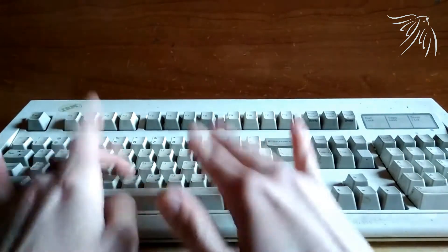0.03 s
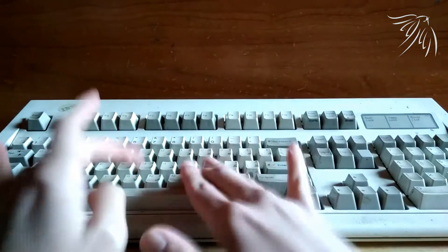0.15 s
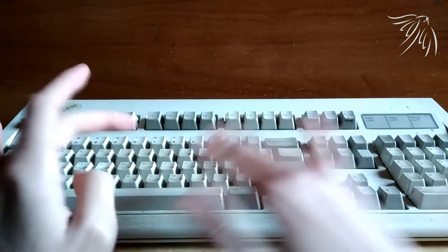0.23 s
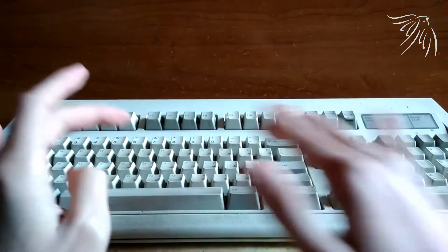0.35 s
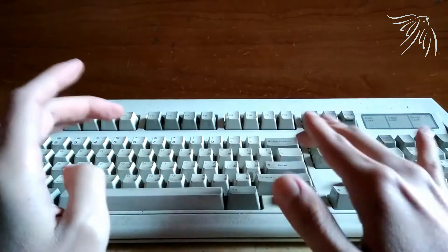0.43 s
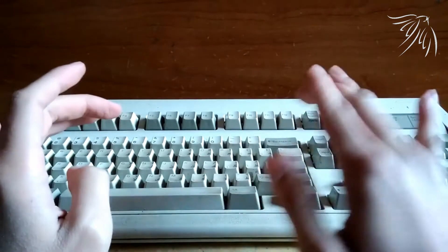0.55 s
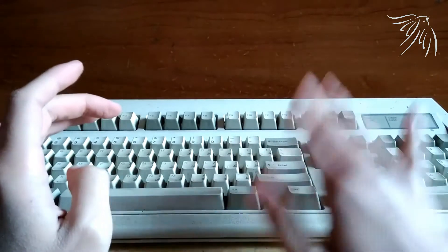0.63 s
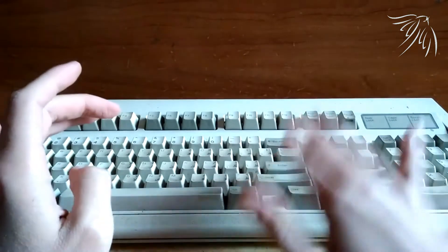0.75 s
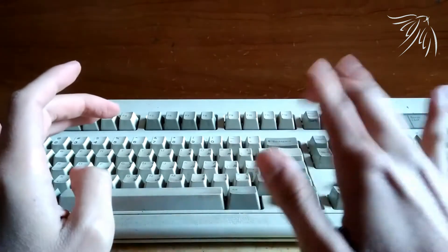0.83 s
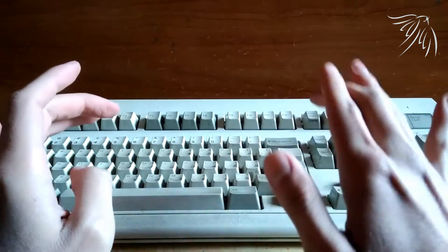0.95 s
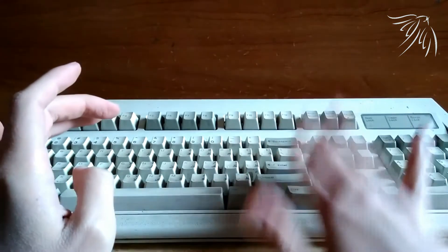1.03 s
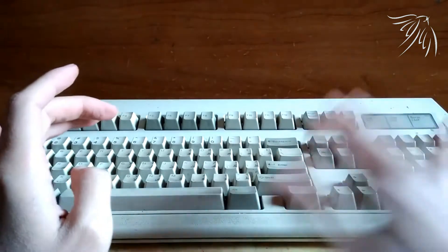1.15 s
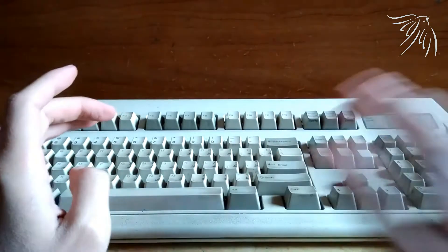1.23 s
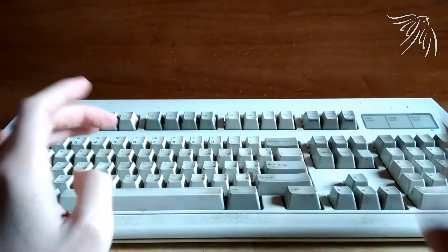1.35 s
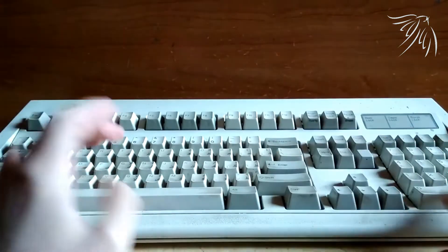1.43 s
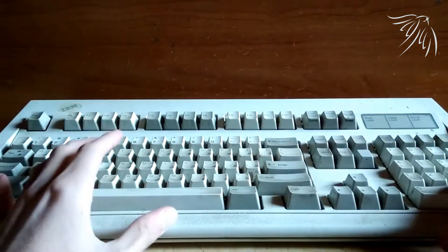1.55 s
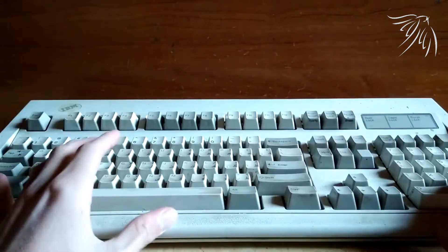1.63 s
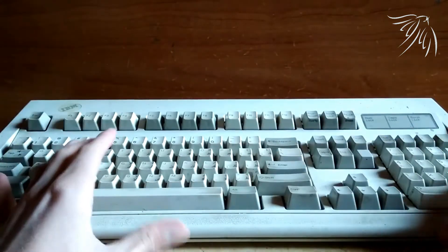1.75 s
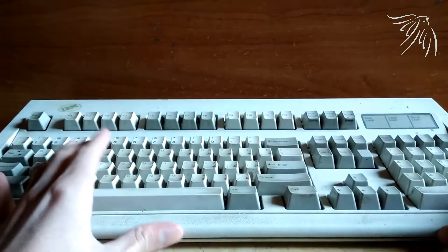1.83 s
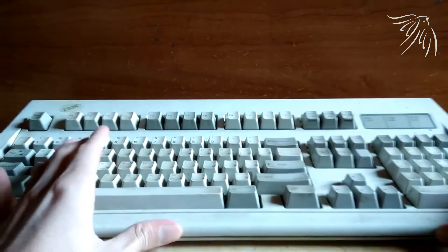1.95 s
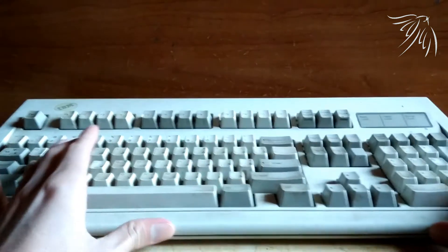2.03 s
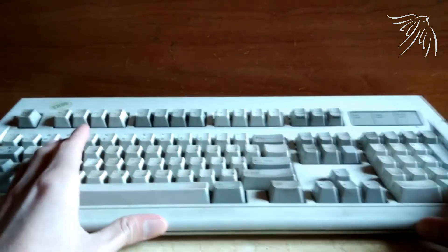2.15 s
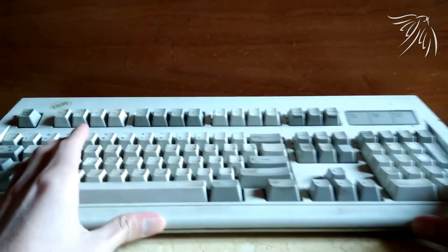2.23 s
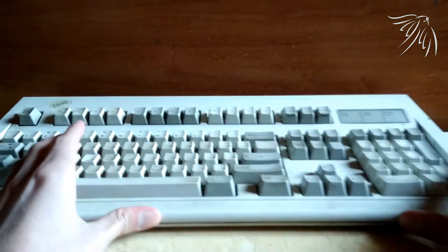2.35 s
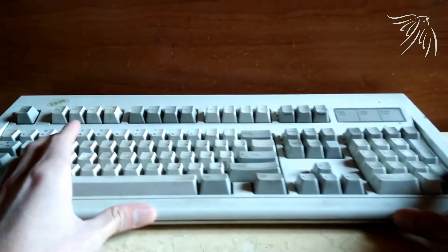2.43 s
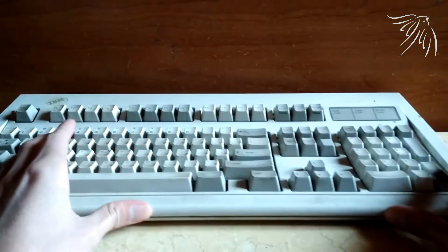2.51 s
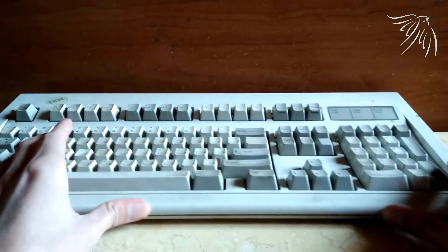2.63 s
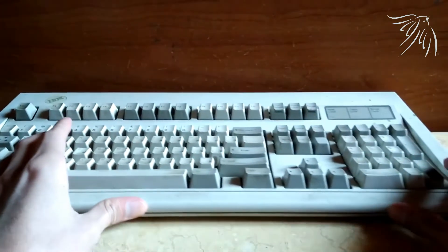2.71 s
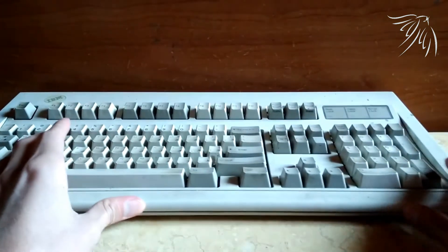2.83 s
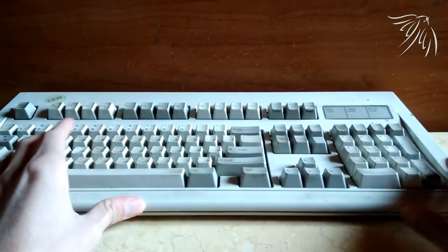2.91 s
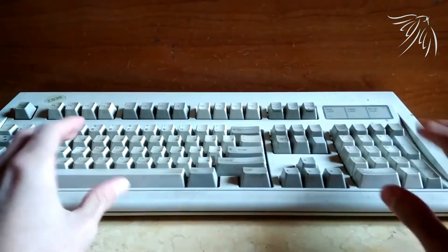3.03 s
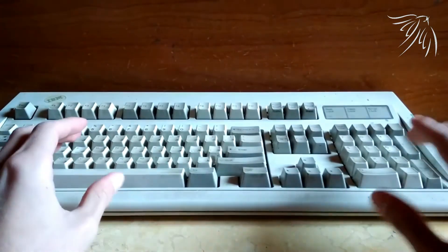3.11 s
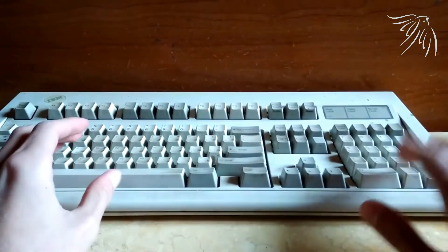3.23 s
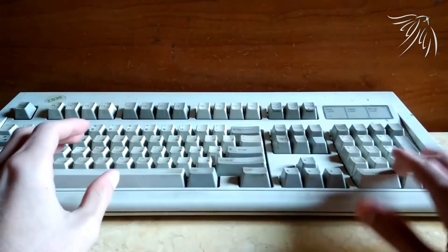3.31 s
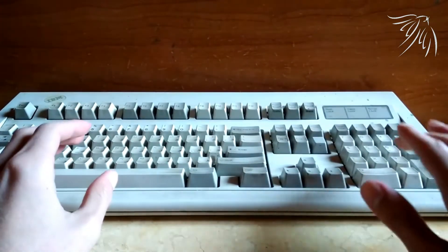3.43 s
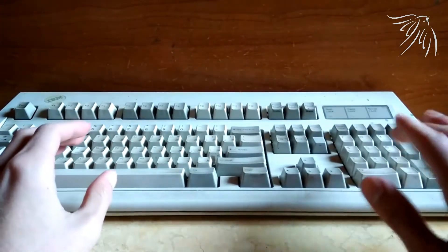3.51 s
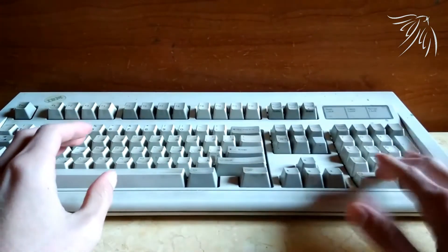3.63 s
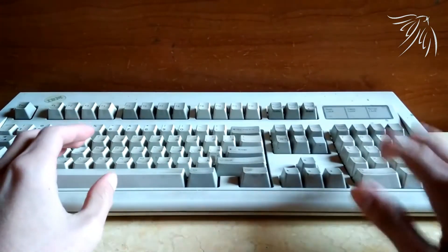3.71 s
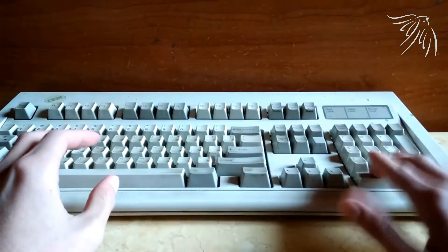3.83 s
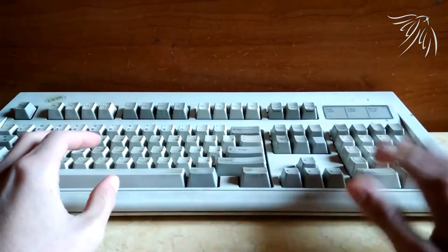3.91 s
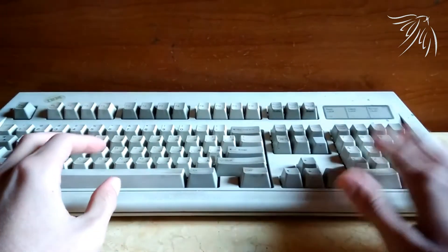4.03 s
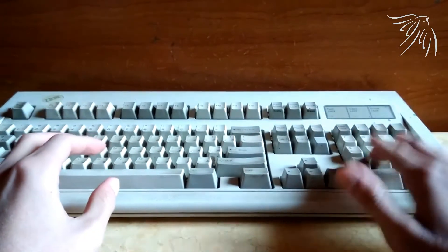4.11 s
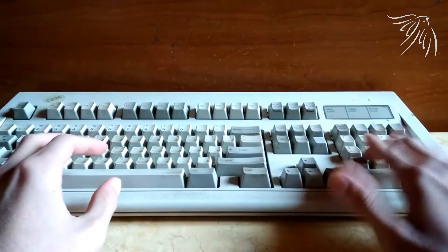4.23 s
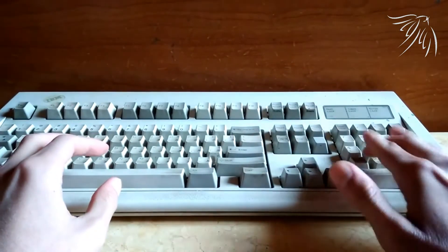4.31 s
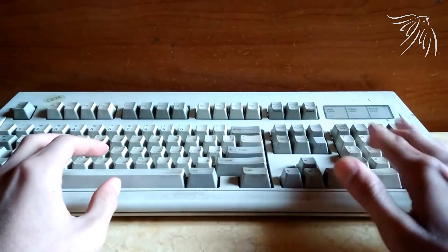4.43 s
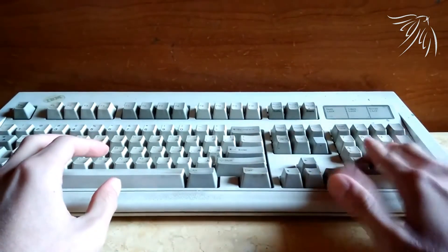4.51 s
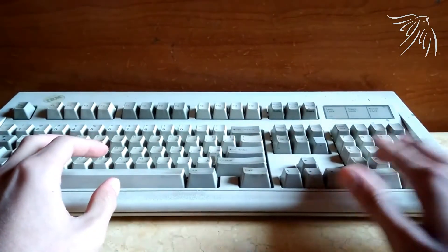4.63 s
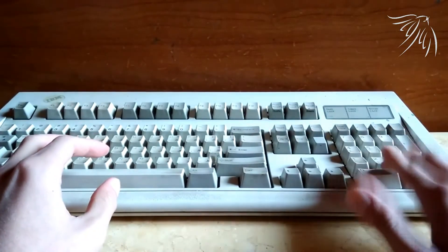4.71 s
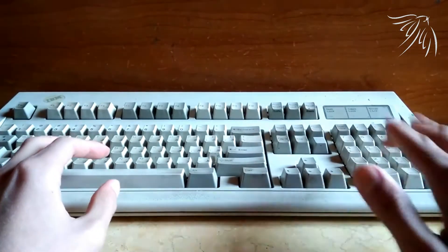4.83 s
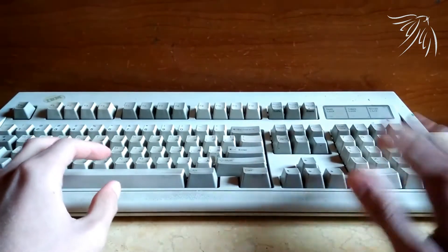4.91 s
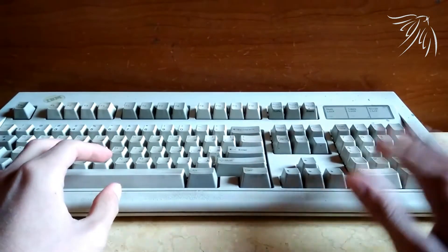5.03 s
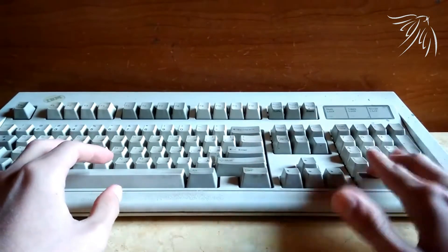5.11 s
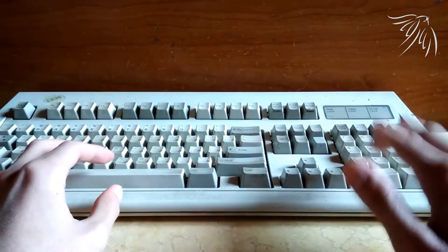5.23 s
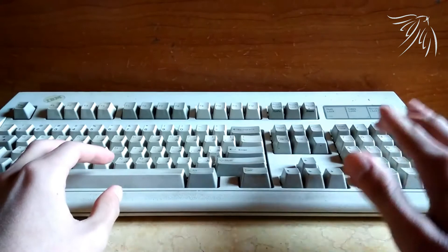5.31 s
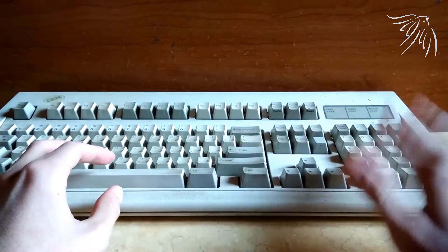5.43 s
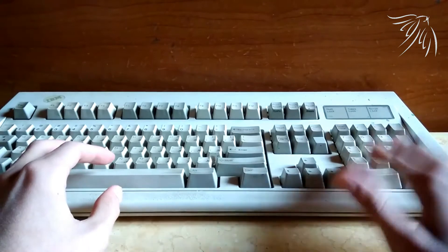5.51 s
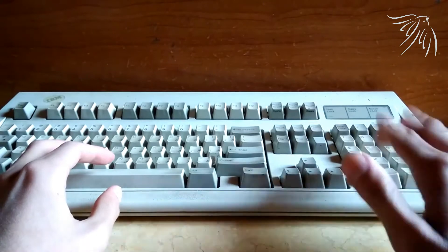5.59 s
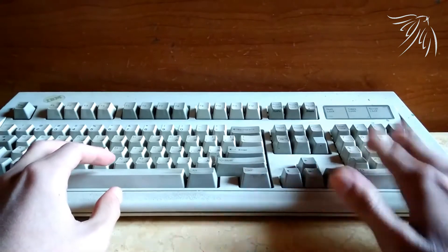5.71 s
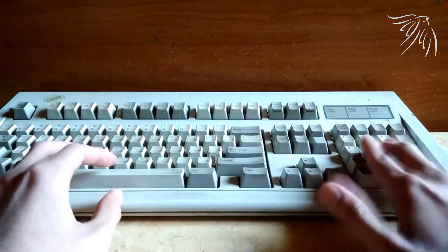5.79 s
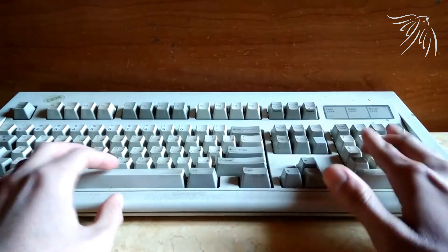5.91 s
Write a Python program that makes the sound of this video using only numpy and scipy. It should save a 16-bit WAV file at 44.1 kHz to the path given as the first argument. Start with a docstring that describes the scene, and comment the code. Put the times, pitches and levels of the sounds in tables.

```python
"""Buckling-spring keyboard on a wooden desk

Single keys are struck and let go, close to a stereo recorder in a small room. Each stroke is a finger
tap, the snap of a buckling spring and a release; these impacts excite damped modes of cap, case and desk.
Midway both hands push the keyboard across the desk, and its feet groan and rasp by stick-slip friction.
The loudest snaps overload the microphones."""
import sys
import numpy as np
from scipy import signal
from scipy.fft import rfft, irfft
from scipy.io import wavfile

SR = 44100
rng = np.random.default_rng(int(sys.argv[2]) if len(sys.argv) > 2 else 0)


def unload_audio(sound):
    """Save the sound as a 16-bit wav file, at the path given as the first command line argument."""
    columns = np.transpose(np.atleast_2d(sound))
    # keep every value between -1 and 1, then stretch to whole-number steps
    steps = np.round(np.clip(columns, -1, 1) * 32767)
    wavfile.write(sys.argv[1], SR, steps.astype(np.int16))


N = 262836
LEAD, ONSET = SR // 10, SR // 100  # samples before time zero; samples of rising noise before an impact
AGE = np.arange(SR // 8) / SR  # time since an impact, s
PUSH_START_S, PUSH_STOP_S = 2.064, 3.018


# presses: t/s, knock level/dB, click level/dB, cap f/Hz, click left minus right/dB,
# finger lead/s, finger knock level/dB
KEY_PRESSES = [(-.018, -9.5, -19.5, 1820, -3, 0.0062, -25), (.1716, -6.5, -21.5, 1860, -5.5, .003, -36),
               (0.294, -8.5, -20, 1904, -13, .002, -28), (.846, -4.5, -9, 1410, -4.5, .0046, -12.5),
               (1.2385, -19.5, -20, 1251, -2.5, 0.0049, -15.5),
               (3.7977, -7.5, -14, 2021, 3.5, 0.0067, -24.5),
               (3.9794, -6.5, -14.5, 2090, -0.5, 0.0049, -28),
               (4.2487, -13.5, -18.5, 2510, 8.5, 0.012, -29), (4.3825, -25, -35, 1070, 2, .003, -38),
               (4.663, -12, -13, 2390, 3, .0087, -21.5), (5.104, -5.5, -11.5, 1966, 5.5, 0.0067, -27.5),
               (5.2999, -5.5, -14.5, 2090, 0, 0.0035, -28.5),
               (5.6362, -6.5, -16.5, 2036, -2.5, 0.0055, -20),
               (5.8242, -11.5, -14.5, 2260, 4.5, 0.0076, -22)]
# keys flying back to the top stop: t/s, knock level/dB, click level/dB
KEY_RELEASES = [(0.374, -10, -18.5), (0.9038, -11.5, -19.5), (1.2944, -12, -19), (3.8614, -14.5, -26.5),
                (4.046, -14.5, -25), (4.315, -24, -37), (4.465, -33, -48), (4.7744, -31, -38),
                (5.1673, -12.5, -23), (5.3588, -12.5, -22), (5.6942, -10, -22), (5.8847, -17.5, -31.5)]
# loose caps touched or rattling: t/s, knock level/dB, click level/dB, cap f/Hz
CAP_TAPS = [(0.1178, -19.5, -25.5, 1740), (0.1249, -24, -24, 1790), (.182, -14, -28.5, 1680),
            (0.2127, -15.5, -23, 1620), (0.2189, -22, -23, 1440), (0.2988, -10, -27, 1890),
            (0.3077, -19, -15, 1467), (1.939, -41.5, -42, 1700), (2.083, -59, -48, 1390),
            (3.411, -39, -44.5, 2160), (3.4818, -25, -36.5, 2085), (4.4051, -27.5, -47, 1110),
            (4.4474, -41, -53.5, 1550), (4.5204, -31, -48.5, 1680), (4.5475, -37, -62.5, 1127),
            (5.141, -27, -41, 2100), (5.671, -22, -38, 1960)]
# dull low knocks of the case, alone or beneath a key stroke: t/s, knock level/dB, f/Hz
CASE_KNOCKS = [(1.24, -23, 560), (1.773, -42.5, 611), (1.942, -39.5, 708), (2.076, -45, 795),
               (3.128, -49, 697), (3.146, -51, 538), (3.419, -38.5, 1000), (3.487, -40.5, 515),
               (4.777, -35, 753), (4.873, -35, 674), (4.945, -50, 930)]

def keys(paths=5, dull_click_db=-19):
    """Impact excitation: every contact gives a knock and a click; dull ones barely stir the springs."""
    strokes = []
    for s, knock_db, click_db, hz, pan_db, early_s, finger_db in KEY_PRESSES:
        strokes.append((s - early_s, finger_db, click_db - 12, 1431, .031))  # the finger lands
        strokes.append((s, knock_db, click_db, hz, .014, pan_db))  # the spring buckles, the key bottoms
    for s, knock_db, click_db in KEY_RELEASES:
        strokes.append((s, knock_db, click_db, 1806, .014))  # the cap hits its top stop
        settle_db = knock_db - 17
        strokes.append((s + .009, settle_db, settle_db + dull_click_db, 850, .025))  # and drops back
    strokes += [(*tap, .033) for tap in CAP_TAPS]
    strokes += [(s, db, db + dull_click_db, hz, .072) for s, db, hz in CASE_KNOCKS]
    # successive strokes take turns among several room responses
    tracks = np.zeros((paths, 2, LEAD + N))
    for k, (s, *stroke) in enumerate(strokes):
        add(tracks[k % paths], s - ONSET / SR, rattle(key_impact(*stroke)))
    return sum(track + room(track) for track in tracks)


def key_impact(knock_db, click_db, cap_hz, ring_s, pan_db=0, case_db=-8, board_db=-6):
    """Superposition: cap, case and board sum to a knock, and the spring adds its click."""
    knock = equal_energy(cap_modes(cap_hz, t60=.58 * ring_s))
    knock += undb(case_db) * equal_energy(case_modes(cap_hz))
    knock += undb(board_db) * equal_energy(board_modes(cap_hz))
    click = equal_energy(spring_click(t60=1.5 * ring_s))
    return undb(knock_db) * knock + undb(click_db + pan_db * np.array([[.5], [-.5]])) * click


# modes of a keycap on the plate: ratio to the cap frequency, level/dB
CAP_MODES = [(.42, -16), (.62, -6.5), (.84, 0.5), (1.001, 4), (1.13, 0)]

def cap_modes(cap_hz, t60, contact_s=.0027, phase_spread_rad=.54):
    """Damped free vibration: the cap's inharmonic modes reach each microphone in a different phase."""
    cap = 0
    for ratio, db in CAP_MODES:
        phase = 2 * np.pi * cap_hz * ratio * (1 + .051 * rng.standard_normal()) * AGE
        cap = cap + undb(db) * np.sin(phase + phase_spread_rad * rng.standard_normal((2, 1)))
    return cap * fade(AGE, t60) * (1 - np.exp(-AGE / contact_s))


# modes of the plastic case and steel plate: f/Hz, level/dB, T60/s
CASE_MODES = [(407, -29, 0.09), (507.7, -13, 0.29), (560, -11.5, 0.063), (680, -9, 0.053),
              (768, -2.5, 0.04), (930, -9, 0.11), (1110, -10.5, 0.053), (1680, -1, 0.051), (1890, 0, 0.052),
              (2248, 12, 0.025), (2715, -6.5, 0.092), (3600, -19, .06), (3700, -10.5, 0.08)]

def case_modes(cap_hz, spot_db=3):
    """Modal excitation: each striking point favours other modes, and a soft blow misses the high ones."""
    hz, db, t60 = np.transpose(CASE_MODES)[:, :, None]
    db = db - bass_loss_db(hz, cap_hz) + spot_db * rng.standard_normal(hz.shape)
    weight = undb(db) * rng.choice([-1, 1], hz.shape) / (1 + (hz / (1.5 * cap_hz)) ** 4)
    detuned_hz = hz * (1 + .055 * rng.standard_normal(hz.shape))
    return np.sum(weight * np.sin(2 * np.pi * detuned_hz * AGE) * fade(AGE, t60), axis=0)


# dense resonances of the whole board: f/Hz, level/dB
BOARD_SPECTRUM = [(100, -23.5), (300, -14), (500, 2), (1000, 5), (2000, -3.5), (2700, 3.5), (4000, -4),
                  (7000, -32.5), (14000, -45.5)]

def board_modes(cap_hz, t60=.04):
    """Modal overlap: resonances too dense to resolve decay as a burst of noise."""
    spectrum = [(hz, db - 10 * np.log10(1 + (hz / (2.3 * cap_hz)) ** 4) - bass_loss_db(hz, cap_hz))
                for hz, db in BOARD_SPECTRUM]
    return colour(stereo_noise(len(AGE), alike=.6) * fade(AGE, t60), spectrum)


def bass_loss_db(hz, cap_hz, db_per_octave=3.5):
    """Weak coupling: a bright blow drives modes less the further they lie below half its frequency."""
    return db_per_octave * np.maximum(np.log2(cap_hz / hz) - 1, 0)


# click of a spring against its barrel: f/Hz, level/dB
CLICK_SPECTRUM = [(500, -30.5), (2000, -18), (3200, 2.5), (4000, 3), (5000, 2), (6500, 0.5), (9000, -9.5),
                  (13000, -12), (16000, -22.5)]

def spring_click(t60, chatter_db=4, rise_s=.0006):
    """Contact chatter: the coil hits its barrel in a quick, uneven series."""
    chatter = undb(chatter_db * np.interp(AGE, np.linspace(0, AGE[-1], 200), rng.standard_normal(200)))
    envelope = chatter * fade(AGE, t60) * (1 - np.exp(-AGE / rise_s))
    return colour(stereo_noise(len(AGE), alike=.26) * envelope, CLICK_SPECTRUM)


def rattle(impact, onset_db=-20, bounce_db=-22, bounce_s=.042, bounces=6):
    """Rebound: light bounces follow each impact; a faint, rising noise before it softens the attack."""
    excitation = np.zeros(len(AGE))
    rising_noise = rng.standard_normal(ONSET) * fade(AGE[:ONSET], t60=.011)[::-1]
    excitation[:ONSET] = undb(onset_db) * unit(rising_noise) / np.sqrt(ONSET)
    excitation[ONSET] = 1
    for late in rng.uniform(.1, 1, bounces):
        excitation[ONSET + int(late * bounce_s * SR)] += undb(bounce_db) * np.exp(-late)
    return signal.fftconvolve(impact, excitation[None], axes=-1)


# modes of a freed spring: f/Hz, level/dB, T60/s
SPRING_MODES = [(701, 0, 1.1), (710, -7, .9), (706, 3, .25), (722, -6, .4)]
# springs singing on after a release: t/s, level/dB
SPRING_PINGS = [(.3745, -39), (.9045, -49.5), (1.2947, -58), (4.0468, -47), (5.1675, -58), (5.3592, -48)]

def spring_pings():
    """Beating: closely spaced modes make the faint note of a freed spring waver."""
    track, note = np.zeros((2, LEAD + N)), ringing(SPRING_MODES, build_cycles=3.5)
    for s, db in SPRING_PINGS:
        add(track, s, undb(db) * note)
    return track


# modes of the wooden desk: f/Hz, level/dB, T60/s
DESK_MODES = [(42, -4.5, 0.29), (57.88, 6, 0.7), (62.63, -9.5, 2), (86.5, -7.5, 0.37), (143, -15, 0.19),
              (179, 4, 0.18), (220.3, -4.5, 0.44)]
# dull shudder of the desk top: f/Hz, level/dB
SHUDDER_SPECTRUM = [(22, -42), (33, -30), (44, -6.5), (58, 10.5), (75, -6.5), (110, -16.5), (190, -4.5),
                    (300, -28.5), (700, -50)]

def desk(shudder_db=-1, recoil_db=-35, moved_db=-.5):
    """Structure-borne sound: a harder press shakes the desk more; a release kicks it lightly."""
    track, t = np.zeros((2, LEAD + N)), np.arange(SR) / SR
    thump = ringing(DESK_MODES, build_cycles=4.7)
    envelope = fade(t, t60=.57) * (1 - np.exp(-t / .017))
    for s, knock_db, *_ in KEY_PRESSES:
        thump_db = -37 + .56 * knock_db + moved_db * (s > PUSH_STOP_S)
        shudder = unit(colour(stereo_noise(SR, alike=.92), SHUDDER_SPECTRUM)) * envelope
        add(track, s, undb(thump_db) * (thump + undb(shudder_db) * shudder))
    for s, knock_db, _ in KEY_RELEASES:
        add(track, s, undb(knock_db + recoil_db) * thump)
    return track


# shoves that make the feet bite: centre t/s, duration/s, gain/dB
SHOVES = [(2.386, 0.035, 3), (2.505, 0.095, 3.5), (2.615, 0.16, 6), (2.848, 0.086, 4.5)]
# groaning case, rasping feet and hissing wood grain, each: f/Hz, level/dB
GROAN_SPECTRUM = [(150, -25), (300, -22.5), (400, -3.5), (520, 1), (680, 0.5), (880, 6.5), (1100, -3),
                  (1500, -23), (3000, -40)]
RASP_SPECTRUM = [(600, -22), (1100, -0.5), (1400, -1), (1720, 1.5), (2000, -4.5), (2450, -0.5), (3000, -5),
                 (4000, -24), (9000, -29.5)]
HISS_SPECTRUM = [(1800, -18), (3200, -3), (4200, -2.5), (5500, 0), (7000, -6), (9000, -13), (13000, -18.5),
                 (16000, -34)]

def sliding_feet(attack_s=.11, release_s=.098, lean_at_s=2.52, lean_s=.2, judder_db=.96, judder_hz=120):
    """Stick-slip friction: the amplitude follows the speed, and the hands' weight deepens the sound."""
    size = LEAD + N
    t = (np.arange(size) - LEAD) / SR
    speed = np.clip(np.minimum((t - PUSH_START_S) / attack_s, (PUSH_STOP_S - t) / release_s), 0, 1)
    lean = np.clip(.5 + (t - lean_at_s) / lean_s, 0, 1)
    judder = rng.standard_normal(4000)
    grip = undb(judder_db * np.interp(t * judder_hz, np.arange(len(judder)), judder))
    for s, length, db in SHOVES:
        grip *= undb(db * np.exp(-(2 * (t - s) / length) ** 2))

    def layer(noise, spectrum, light_db, heavy_db):
        return speed * undb(light_db + (heavy_db - light_db) * lean) * unit(colour(noise, spectrum))

    groan = layer(grip * stereo_noise(size, alike=.76), GROAN_SPECTRUM, light_db=-46, heavy_db=-41)
    rub = grip * stereo_noise(size, alike=.055)
    rub = (1 - lean) * resonate(rub, hz=2260, q=3.1) + lean * resonate(rub, hz=1700, q=3.1)
    rasp = layer(rub, RASP_SPECTRUM, light_db=-39.5, heavy_db=-40)
    hiss = layer(grip * stereo_noise(size, alike=.038), HISS_SPECTRUM, light_db=-44.5, heavy_db=-54)
    return groan + rasp + hiss


# skin brushing caps and case: centre t/s, duration/s, level/dB, centre f/Hz
SKIN_BRUSHES = [(1.525, 0.21, -61.5, 6030), (1.843, 0.14, -64, 780), (2.04, 0.07, -60.5, 2000),
                (3.144, 0.027, -71.5, 575), (3.472, 0.051, -53.5, 2030), (4.56, 0.053, -49.5, 867),
                (4.915, 0.16, -51, 773)]

def skin_brushes():
    """Friction noise: skin sliding on plastic gives soft, band-limited swells."""
    track, t = np.zeros((2, LEAD + N)), np.arange(SR // 2) / SR
    for s, length, db, hz in SKIN_BRUSHES:
        swell = np.sin(np.pi * np.minimum(t / length, 1))
        band = unit(resonate(stereo_noise(len(t), alike=.49), hz, q=2.1))
        add(track, s - length / 2, undb(db) * swell * band)
    return track


# colour of the reverberation: f/Hz, level/dB
REVERB_SPECTRUM = [(60, 0.5), (200, -10.5), (500, 1.5), (1000, -2.5), (2000, -10), (4000, 2), (7000, -0.5),
                   (14000, -10)]
# reverberation times: f/Hz, T60/s
REVERB_TIMES = [(100, 0.5), (500, 0.28), (2000, 0.34), (6000, 0.28), (14000, 0.37)]

def room(x, wet_db=-5, first_s=.0028, build_s=.0065, alike_below_hz=1100):
    """Diffuse field: a small hard room reverberates, coherent at the two microphones in the bass."""
    t, hz = np.arange(SR) / SR, np.fft.rfftfreq(SR, 1 / SR)
    alike = 1 / (1 + (hz / alike_below_hz) ** 2)
    shared = np.sqrt(alike) * rfft(rng.standard_normal(SR))
    noise = shared + np.sqrt(1 - alike) * rfft(rng.standard_normal((2, SR)))
    tail = 0
    for centre, t60 in REVERB_TIMES:
        band = at_hz([(f, float(f == centre)) for f, _ in REVERB_TIMES], hz)
        tail = tail + irfft(noise * band) * fade(t, t60)
    onset = 1 - np.exp(-np.maximum(t - first_s, 0) / build_s)
    response = colour(unit(tail * onset) / np.sqrt(SR), REVERB_SPECTRUM)
    return undb(wet_db) * signal.fftconvolve(x.mean(axis=0)[None], response, axes=-1)[:, :x.shape[-1]]


# indoor background: f/Hz, relative spectral level/dB
AMBIENT_SPECTRUM = [(20, -9.5), (32, -14), (45, -6.5), (60, -4), (100, -4.5), (200, -4), (320, -9.5),
                    (600, -13), (1200, -20.5), (3000, -24.5), (7000, -27), (14000, -29)]

def ambience(level_db=-64):
    """Stationary noise: a quiet indoor rumble and hiss."""
    return undb(level_db) * unit(colour(stereo_noise(LEAD + N, alike=.52), AMBIENT_SPECTRUM))


def ringing(modes, build_cycles):
    """Resonant build-up: modes take a few cycles to grow, then decay freely."""
    t = np.arange(SR) / SR
    return sum(undb(db) * np.sin(2 * np.pi * hz * t) * fade(t, t60) * (1 - np.exp(-t * hz / build_cycles))
               for hz, db, t60 in modes)


def resonate(x, hz, q):
    """Second-order resonance with unit gain at its centre."""
    return signal.lfilter(*signal.iirpeak(hz, q, fs=SR), x)


def colour(x, points, size=2048):
    """Minimum-phase filter of shape (f/Hz, level/dB), made by folding the cepstrum."""
    cepstrum = irfft(np.log(undb(at_hz(points, np.fft.rfftfreq(size, 1 / SR)))))
    cepstrum[1:size // 2] *= 2
    cepstrum[size // 2 + 1:] = 0
    response = irfft(np.exp(rfft(cepstrum))).reshape((1,) * (x.ndim - 1) + (-1,))
    return signal.fftconvolve(x, response, axes=-1)[..., :x.shape[-1]]


def at_hz(points, hz):
    """Interpolation of (f/Hz, value) points on a logarithmic frequency axis."""
    f, value = np.transpose(points)
    return np.interp(np.log(np.maximum(hz, 1)), np.log(f), value)


def stereo_noise(size, alike):
    """Partial coherence: two noises with correlation `alike`."""
    shared = rng.standard_normal(size)
    return np.sqrt(alike) * shared + np.sqrt(1 - alike) * rng.standard_normal((2, size))


def undb(db):
    """Amplitude ratio of a level."""
    return 10 ** (np.asarray(db) / 20)


def fade(t, t60):
    """Exponential decay of 60 dB in t60 seconds."""
    return np.exp(-np.log(1000) * t / t60)


def unit(x):
    """Normalisation to rms 1."""
    return x / np.sqrt(np.mean(x ** 2))


def equal_energy(x, knock_s=.005):
    """Normalisation to the energy of a short knock at rms 1."""
    return unit(x) * np.sqrt(knock_s * SR / x.shape[-1])


def add(track, s, sound):
    """Superposition at time s on a track that starts LEAD samples early."""
    start = max(int(s * SR) + LEAD, 0)
    part = sound[..., :track.shape[-1] - start]
    track[:, start:start + part.shape[-1]] += part


def scene():
    """Linear superposition of keyboard, hands, desk and room."""
    friction = sliding_feet() + skin_brushes()
    return (keys() + spring_pings() + friction + room(friction) + desk() + ambience())[:, LEAD:]


# responses of the two microphone ports, each: f/Hz, gain/dB
LEFT_RESPONSE = [(100, 2.5), (1000, -4.5), (2200, -4), (3500, -5), (5000, -4.5), (6200, 1.5), (6900, 10.5),
                 (7600, 1), (9500, 2), (13500, -6.5)]
RIGHT_RESPONSE = [(100, 3), (1000, -2.5), (2200, -1), (3500, -2.5), (5000, -4), (6500, -2), (8000, 3),
                  (10500, 5), (12500, 3), (14000, 1.5)]

def record(dry, cutoff_hz=14300):
    """Port resonance colours each channel, saturation flattens loud snaps and a low-pass cuts the top."""
    heard = np.array([colour(dry[0], LEFT_RESPONSE), colour(dry[1], RIGHT_RESPONSE)])
    limited = heard / (1 + heard ** 8) ** (1 / 8)
    return signal.sosfilt(signal.ellip(8, .2, 70, cutoff_hz, fs=SR, output="sos"), limited)


dry = scene()
out = record(dry)
unload_audio(out)
```